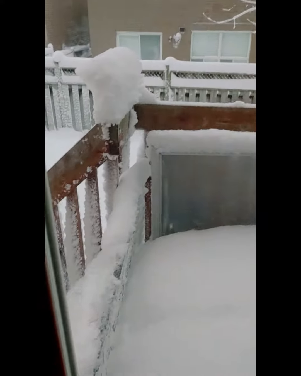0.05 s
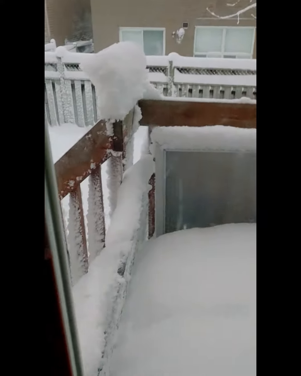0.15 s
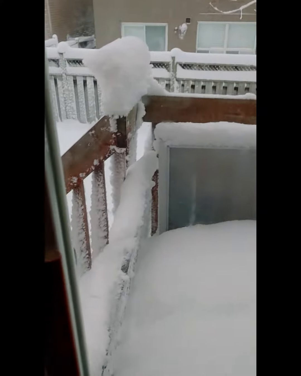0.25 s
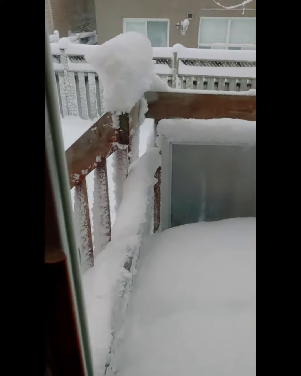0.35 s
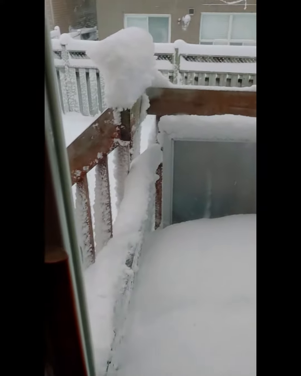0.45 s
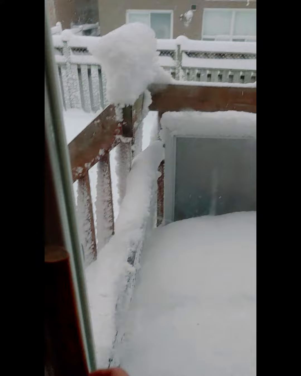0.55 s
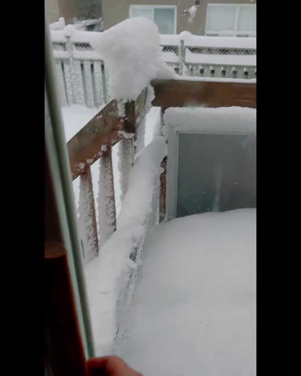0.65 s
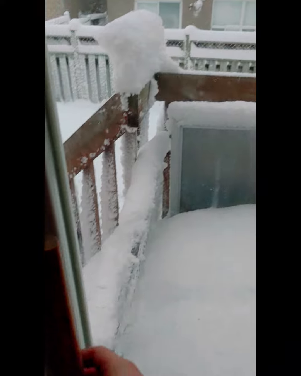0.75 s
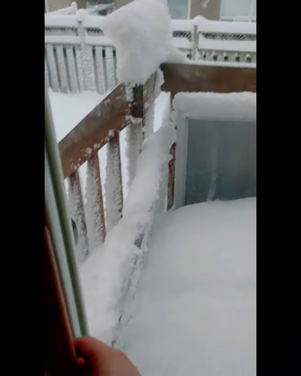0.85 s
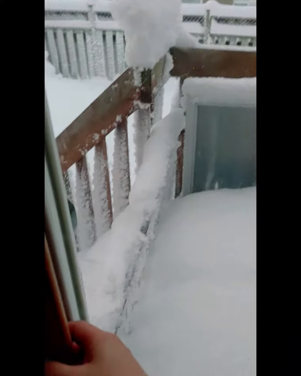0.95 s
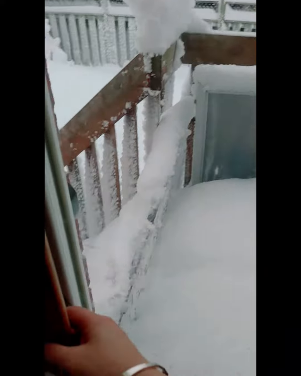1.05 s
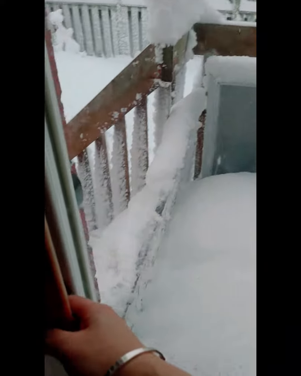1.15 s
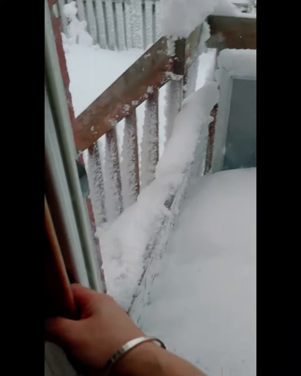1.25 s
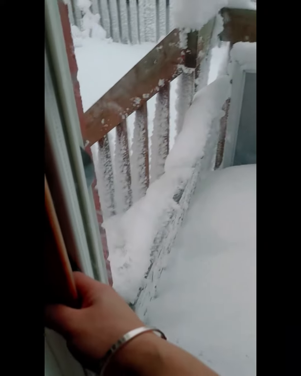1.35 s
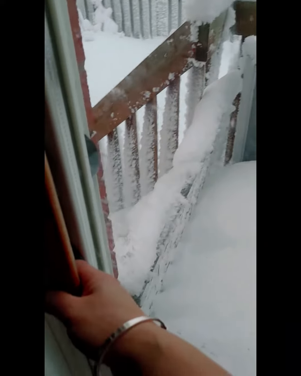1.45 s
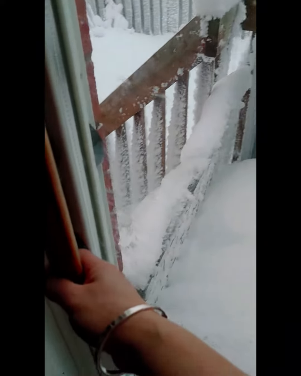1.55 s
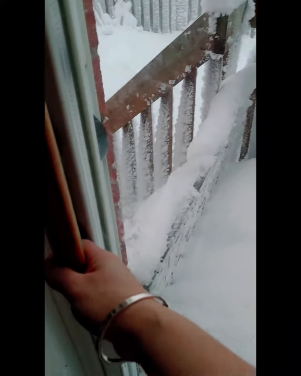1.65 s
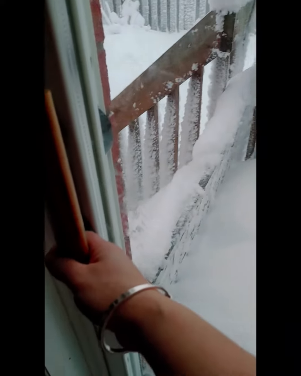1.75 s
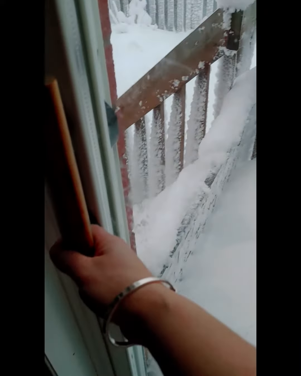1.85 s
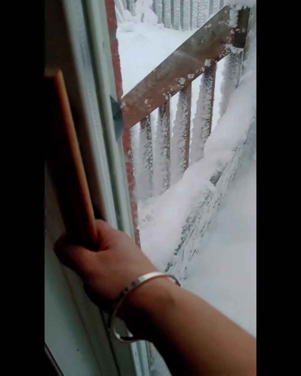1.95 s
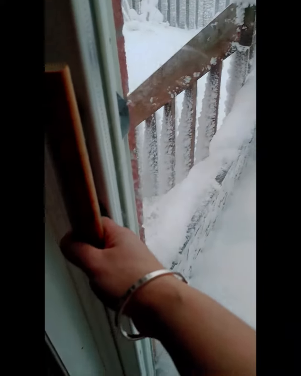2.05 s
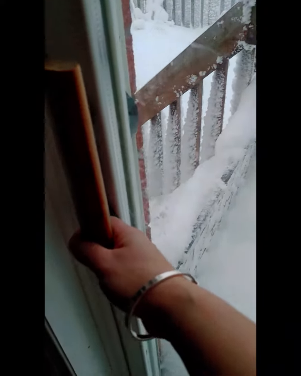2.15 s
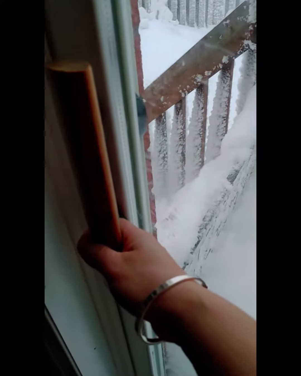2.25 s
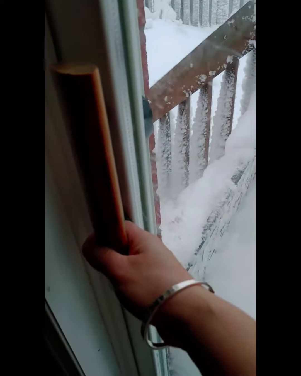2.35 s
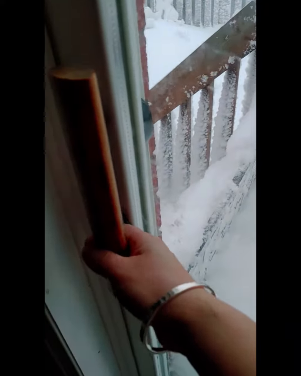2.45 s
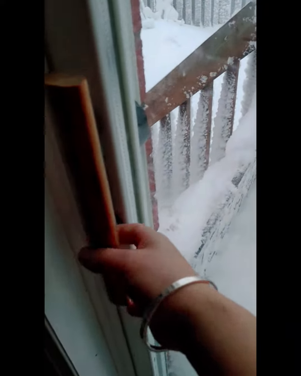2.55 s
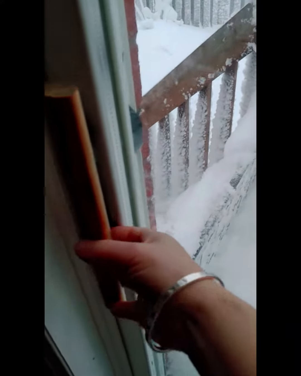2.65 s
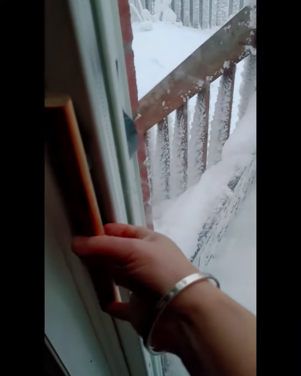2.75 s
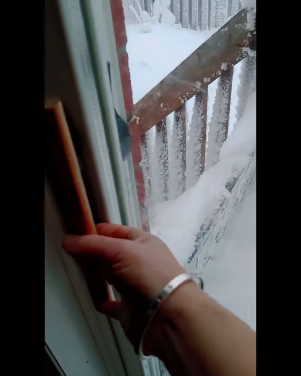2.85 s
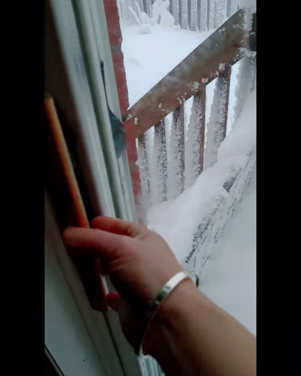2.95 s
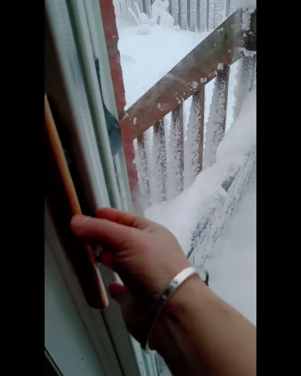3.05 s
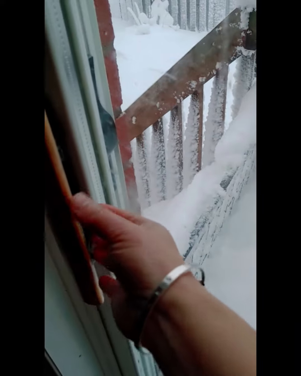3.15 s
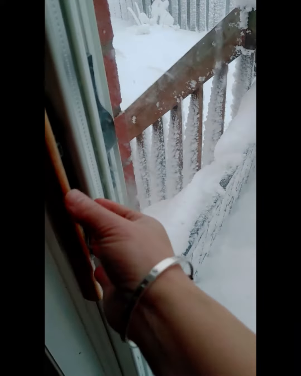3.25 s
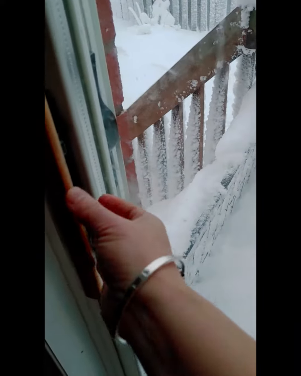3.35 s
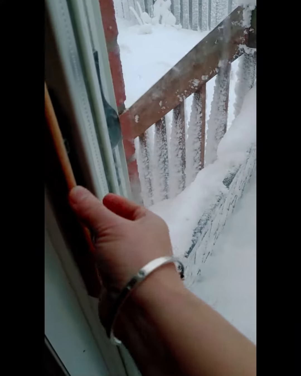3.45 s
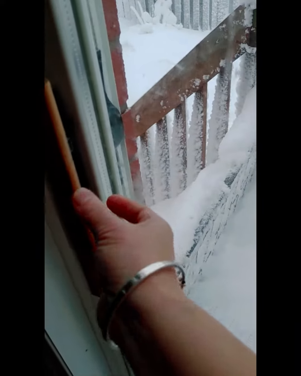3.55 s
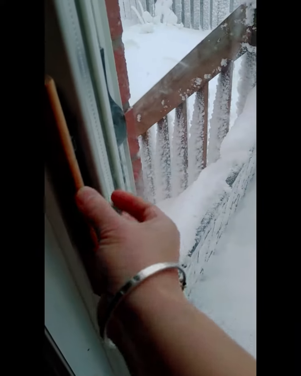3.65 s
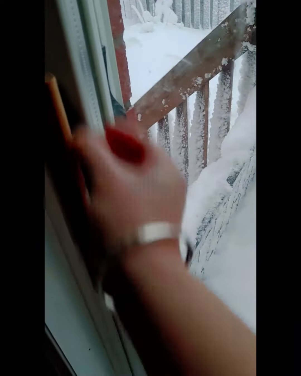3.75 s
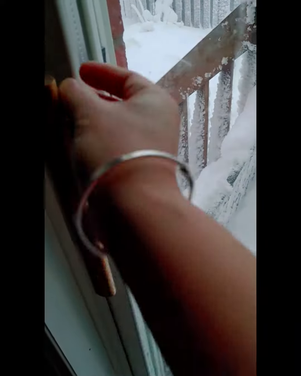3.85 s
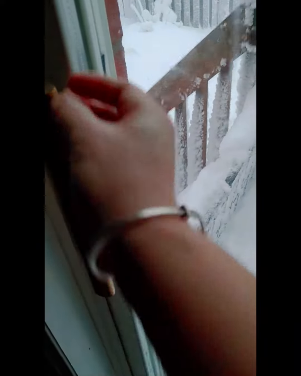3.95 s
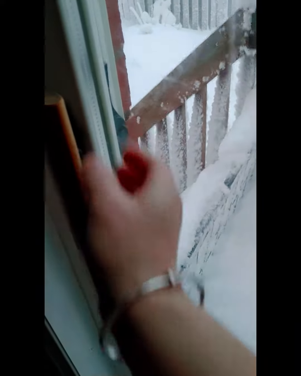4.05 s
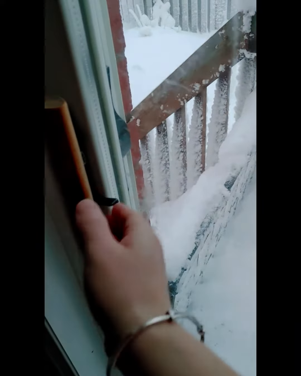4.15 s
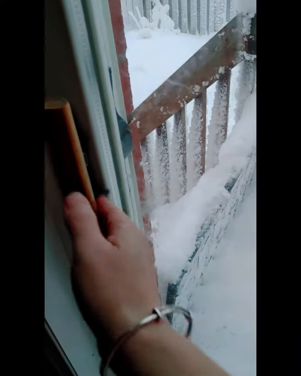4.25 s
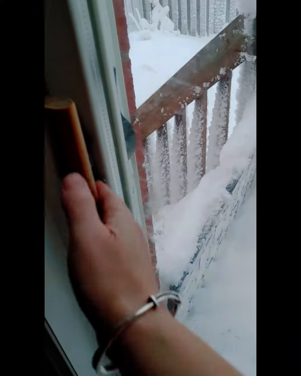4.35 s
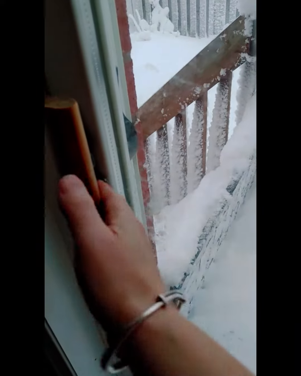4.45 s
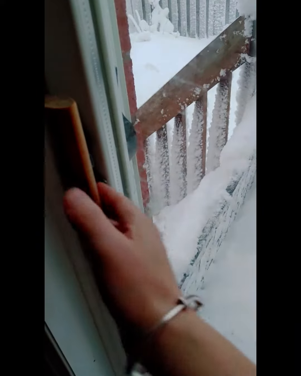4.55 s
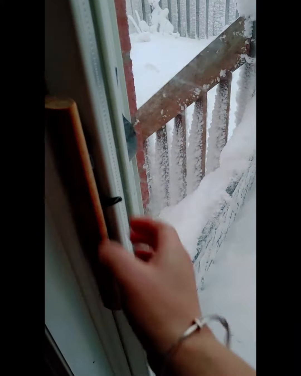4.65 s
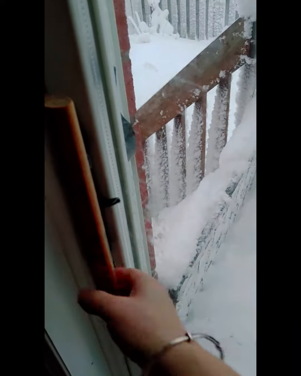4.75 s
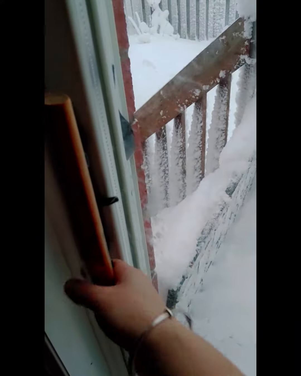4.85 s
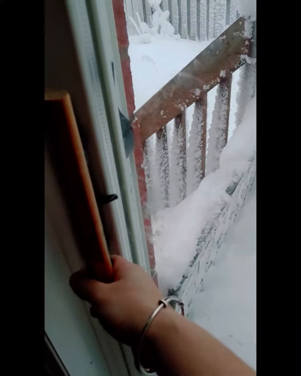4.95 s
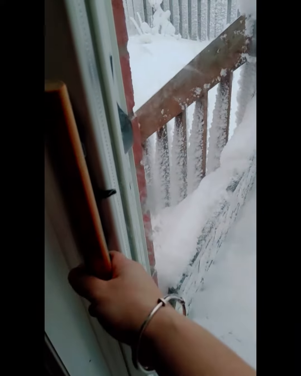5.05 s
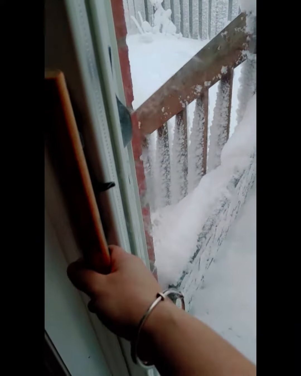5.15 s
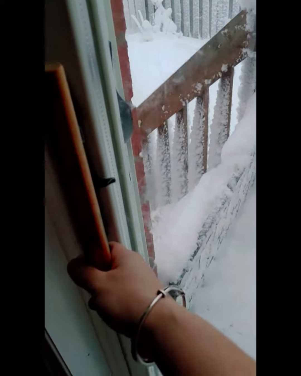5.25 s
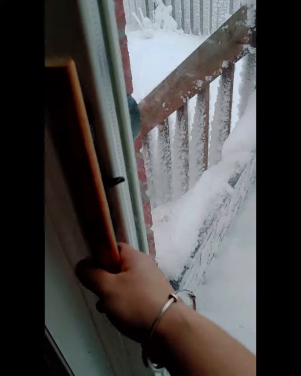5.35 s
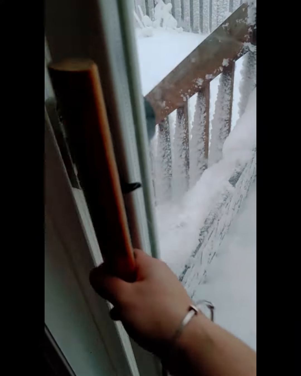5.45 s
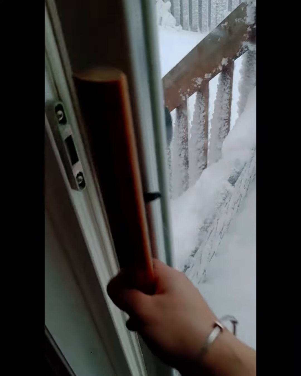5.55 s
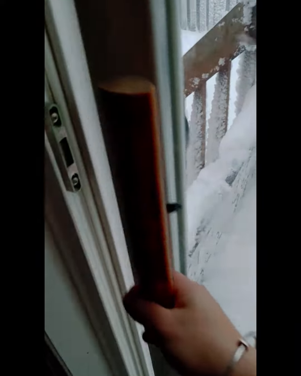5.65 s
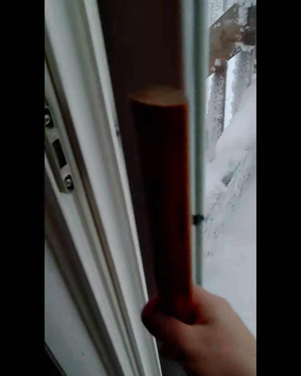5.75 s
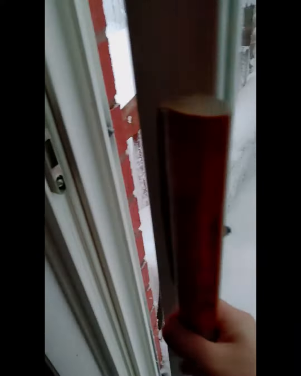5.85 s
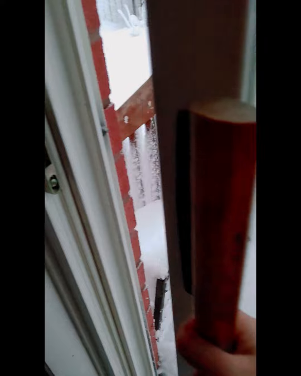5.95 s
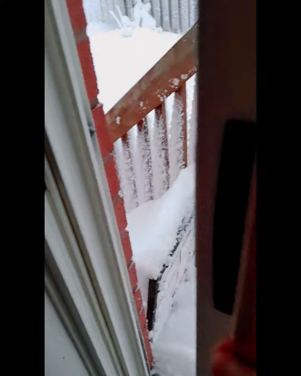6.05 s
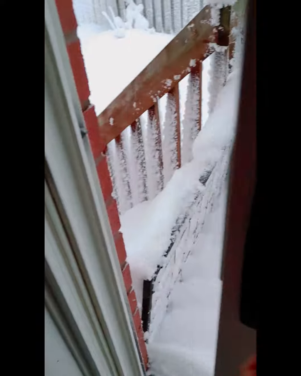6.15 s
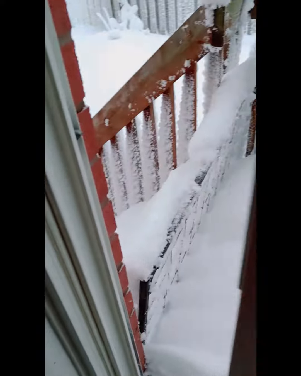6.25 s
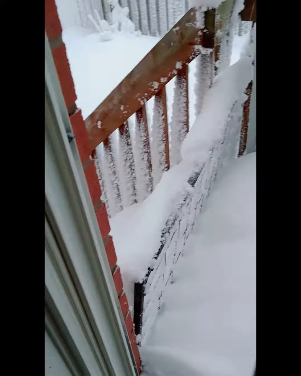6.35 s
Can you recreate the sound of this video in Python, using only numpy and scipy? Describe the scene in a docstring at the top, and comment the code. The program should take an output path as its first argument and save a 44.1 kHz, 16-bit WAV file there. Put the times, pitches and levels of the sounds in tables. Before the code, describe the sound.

Close by in a quiet room with faint ventilation, a hand works a sliding door's wooden handle: sparse clacks, metallic ticks, soft rubs and a tiny squeak. A dense rattle of knocks follows. Then the sticky seal rasps louder and brighter until it snaps free, and the heavy pane rolls away with low rumble, crunching grit and chattering rollers.

```python
"""In a quiet room with a soft ventilation hush, a hand works the wooden handle and latch of a sliding glass door:
clicks, knocks, rubs and squeaks, made as struck resonances and stick-slip friction.
Then the door tears out of its weather seal, a rasp of friction that grows until it comes free.
Last it rolls along the track: the pane rumbles as filtered noise, grit crunches and the rollers rattle.
Two close microphones hear it, the right channel a few milliseconds late."""
import sys
import numpy as np
from scipy import signal
from scipy.fft import rfft, irfft, next_fast_len
from scipy.io import wavfile
from scipy.ndimage import map_coordinates

SR = 44100
rng = np.random.default_rng(int(sys.argv[2]) if len(sys.argv) > 2 else 0)


def bounce(signal):
    """Save signal as a 16-bit WAV file at the path given by the first command-line argument."""
    frames = np.transpose(np.atleast_2d(signal))
    limited = np.clip(frames, -1, 1)
    pcm = np.round(limited * 32767).astype(np.int16)
    wavfile.write(sys.argv[1], SR, pcm)


N = 282681
TIME = np.arange(N) / SR  # s

# All levels are relative. A stroke's half length is the standard deviation of its bell.
# Handle knocking against the door. Each row: start in seconds, latch clack, metal tick, wood and door thud
# in dB, centres of the thud, the clack and the tick in Hz, left minus right in dB.
KNOCKS = [(1.3835, -44, -48, -35.5, -51, 480, 4800, 6700, -1),
          (2.57, -48, -59, -41.5, -79, 517, 2460, 6000, 2.5),
          (2.99, -30.5, -65.5, -34, -47, 700, 3240, 7300, -1.5),
          (3.6825, -51, -61, -48, -61.5, 550, 2490, 7560, 1),
          (3.694, -46, -57, -42.5, -52.5, 290, 2720, 7600, 1),
          (3.712, -54.5, -67.5, -56, -47.5, 320, 2720, 7600, -1.5),
          (3.749, -32, -29, -33, -46, 524, 3500, 7300, 0),
          (3.796, -51.5, -53.5, -62, -47.5, 480, 4300, 7300, 1),
          (3.8266, -50, -50, -54, -41.5, 210, 2520, 7800, 1),
          (4.3785, -44, -42.5, -45.5, -46.5, 600, 2500, 8600, 0.5),
          (4.64, -38.5, -60, -48.5, -45.5, 193, 2840, 8200, 0)]
# Latch clicking on its own. Each row: start in seconds, latch clack in dB, metal tick in dB,
# centre of the clack in Hz, centre of the tick in Hz, left minus right in dB.
CLICKS = [(1.528, -66, -49.5, 2700, 10600, 4), (1.5838, -40.5, -42, 2670, 7500, -1.5),
          (1.891, -79, -62, 4400, 7700, 12), (2.51, -71, -72, 4900, 9000, 3),
          (2.908, -68.5, -72.5, 2430, 7500, -1.5), (3.3, -66.5, -77, 4400, 7000, -3),
          (3.349, -76.5, -70, 3780, 8340, 1.5), (4.319, -60, -69, 3300, 7500, -2),
          (4.6145, -41.5, -57, 2800, 7440, 1.5), (4.636, -65, -57.5, 2700, 8400, 18.5),
          (4.987, -70, -72, 3000, 7500, -1), (5.084, -39.5, -42, 4200, 7970, -0.5)]
# Latch tongue juddering along its keeper. Each row: start in seconds, latch clack in dB, metal tick in dB,
# centre of the clack in Hz.
JUDDERS = [(3.676, -57.5, -60, 4270), (4.5941, -43, -56, 2720)]
# Light touches that only ring the handle and latch. Each row: start in seconds, level in dB, centre in Hz.
TAPS = [(1.53, -76, 2700), (1.552, -69, 2450), (2.136, -61, 1190), (2.632, -64.5, 1170), (2.903, -77, 2430),
        (2.95, -60.5, 1120), (4.285, -70.5, 2550), (4.316, -53, 2480), (4.348, -68, 2430),
        (4.574, -66.5, 2780), (4.642, -56, 1590), (5.082, -55, 1560)]
# Loose handle shuddering. Each row: peak in seconds, level in dB, half length in seconds.
SHUDDERS = [(3.686, -50.5, 0.014), (3.806, -54.5, 0.013)]
# Fingers sliding on the handle. Each row: peak in seconds, level in dB, half length in seconds.
RUBS = [(2.11, -65.5, 0.11), (2.145, -60, 0.0077), (2.63, -65.5, 0.043), (3.728, -48, 0.032),
        (4.32, -63.5, 0.033)]
# Hand brushing the frame. Each row: peak in seconds, level in dB, half length in seconds.
BRUSHES = [(2.12, -90, .07), (2.54, -75, 0.04), (2.7, -82, 0.047), (4.29, -80, 0.031), (4.85, -75.5, 0.049)]
# Squeaks of the gripped handle and the latch. Each row: peak in seconds, level in dB, half length in seconds,
# pitch in Hz, width in Hz, glide in Hz per second.
SQUEAKS = [(2.115, -57.5, 0.033, 1205, 35, 700), (2.13, -67, 0.025, 2500, 120, 1000),
           (3.707, -39, 0.006, 15330, 500, 0), (4.605, -70.5, 0.0065, 14700, 500, 0)]
# Tugs against the seal: the higher rows are patches of the seal giving way, the lower ones surges of the door
# body groaning. Each row: peak in seconds, level in dB, half length in seconds, centre in Hz.
TUGS = [(5.235, -51, 0.014, 280), (5.256, -36.5, 0.016, 1000), (5.3215, -27.5, 0.0055, 1900),
        (5.341, -33, .005, 1300), (5.353, -41.5, 0.013, 400), (5.358, -24.5, 0.0045, 2000)]
# Snaps as the strip unsticks. Each row: start in seconds, level in dB.
UNSTICKINGS = [(5.2499, -47.5), (5.255, -38), (5.27, -31.5), (5.275, -32), (5.2817, -33), (5.286, -29.5),
               (5.2995, -30.5)]
# Bumps in the track jolting the door. Each row: start in seconds, level in dB, centre of the thud in Hz.
BUMPS = [(5.494, -44.5, 416), (5.551, -44, 400), (5.62, -39.5, 400), (5.672, -47, 484), (5.713, -43, 450),
         (5.931, -37.5, 317), (6.252, -40.5, 420)]
# Rollers chattering on the track. Each row: start in seconds, scrape in dB, frame knock in dB,
# length in seconds, centre in Hz.
RATTLES = [(5.666, -42.5, -48, 0.034, 2700), (5.819, -47, -52, 0.028, 4200), (5.856, -49, -56, 0.024, 3400),
           (5.885, -37.5, -43, 0.016, 3000), (5.966, -33.5, -48, 0.022, 3500),
           (6.076, -37.5, -37, 0.05, 2700), (6.177, -43, -44, 0.013, 2600), (6.221, -49, -46, 0.021, 3300),
           (6.263, -46, -48, 0.03, 3200), (6.312, -50, -50, 0.014, 2700), (6.376, -33.5, -47, 0.02, 3200)]
# Pane flexing as it is shoved. Each row: peak in seconds, level in dB, half length in seconds.
FLEXES = [(5.72, -59, 0.28)]

# Resonances of the dry snap at first touch, the wooden handle, the latch, its metal tongue, the snapping strip,
# the hollow frame, the pane, the flexing pane, the track and the air in the ducts.
# Each row: frequency in Hz, width in Hz, level in dB.
TOUCH_MODES = [(1700, 1200, -4.5), (3270, 1050, 7)]
HANDLE_MODES = [(804, 185, -3.5), (1068, 71, 5.5), (1306, 87, 3.5), (1500, 270, -6.5)]
LATCH_MODES = [(2330, 170, 5), (2490, 160, 6.5), (2843, 196, 0.5), (3940, 160, -9), (4330, 560, -3),
               (5510, 240, -19.5)]
METAL_MODES = [(6300, 690, -4), (7500, 1440, 4), (8040, 2180, 0.5), (9450, 900, -7.5), (11640, 1600, -15)]
PEEL_MODES = [(4080, 560, -0.5), (7280, 1000, 6), (11400, 2000, -12.5)]
FRAME_MODES = [(1224, 30, -2), (1272, 25, -2), (1377, 40, 4), (1451, 25, 0), (1531, 30, 3), (1690, 25, -3),
               (2255, 35, -3), (2547, 35, -2), (3872, 40, -3), (4372, 30, -2), (4910, 35, -2),
               (6060, 25, -4), (6997, 40, -1), (7327, 40, -2), (7960, 150, -4)]
PANE_MODES = [(188, 26, -10), (243.3, 19, -6), (257, 6.7, 1), (322, 65, 1), (473, 36, 0.5), (515.8, 30, 5),
              (561.5, 27, 4), (645, 13, -5), (732, 8.2, -5), (832, 13, -11.5)]
FLEX_MODES = [(67, 20, -4), (127, 40, 3.5)]
TRACK_MODES = [(2540, 90, -5), (2790, 80, -7), (3197, 120, -1), (3830, 60, -9), (3950, 60, -8),
               (4940, 52, -5)]
DUCT_MODES = [(166, 9, -9.5), (264.1, 3, -1.5), (312.7, 24, -10), (564, 53, -15)]

# Decaying modes of the handle with its latch case, and low modes of the door.
# Each row: frequency in Hz, level in dB, time to fall 60 dB in seconds.
CASE_MODES = [(797, -6, .07), (1061, -3, .045), (1174, -1, .04), (1340, -4, .06), (1540, -2, .06),
              (2180, -9, .05), (2310, -4, .035), (2440, -2, .032), (2783, 0, .04), (3700, -2, .04),
              (4301, -9, .04), (4500, -5, .032), (4950, -8, .04)]
DOOR_MODES = [(175, -4, 0.081), (197, -4.5, 0.047), (237.2, 3, 0.11), (263, -12.5, 0.1), (317, -5, 0.061),
              (408.4, 5.5, 0.075), (469, -5.5, 0.18), (503, -12, 0.36), (566, -6, 0.16), (643, 5, 0.077),
              (804.4, -3, 0.14)]

# Spectra of skin on wood, the hand on the frame, the seal's rasp, the rolling rumble, grit crushed in the track,
# the scraping rollers and the ventilation hush. Each row: frequency in Hz, density in dB per Hz.
SKIN_SPECTRUM = [(100, -6.5), (220, 5), (600, -3.5), (1200, -3.5), (1900, -16), (2600, -13), (4500, -20),
                 (8000, -21), (10000, -33.5), (15000, -34)]
BRUSH_SPECTRUM = [(1000, -20), (2700, 6), (4300, -12), (5100, 11), (5800, -9), (7500, 3), (10000, -9),
                  (11800, 6.5), (13500, -18)]
RASP_SPECTRUM = [(30, -31), (120, -32), (250, -11.5), (600, -6.5), (900, -4.5), (1400, -8.5), (2000, -5),
                 (2800, -1.5), (4500, -0.5), (5600, -2), (7600, -4.5), (9500, -13.5), (11800, -11.5),
                 (13000, -26), (16000, -32.5)]
RUMBLE_SPECTRUM = [(25, -36.5), (65, -45), (140, -9), (250, -3), (400, 8), (600, 6), (850, 1.5), (1050, -5),
                   (1400, -11), (2000, -9.5), (4000, -49)]
GRIT_SPECTRUM = [(600, -10), (1200, 1), (1900, -4), (2700, 4), (3300, 1), (4500, -3), (5700, -10),
                 (8200, -10), (9800, -26), (11800, -17), (13000, -46), (16000, -47)]
ROLLER_SPECTRUM = [(500, -6), (1100, 6), (1900, -2), (2700, 5.5), (3200, 3.5), (4100, 4.5), (5700, -6),
                   (8200, -8), (9800, -28), (11800, -27), (13000, -46), (16000, -57)]
HUSH_SPECTRUM = [(15, -78), (25, -46.5), (75, -21), (135, -14.5), (163, -13), (202, -15.5), (264, -11.5),
                 (354, -18), (488, -15), (655, -25.5), (927, -24), (1150, -29.5), (2130, -38),
                 (2630, -35.5), (15000, -54)]

# Likeness of the two microphones. Each row: frequency in Hz, correlation from 0 to 1.
ALIKE = [(60, 0.73), (250, 0.96), (500, 0.53), (800, 0.06), (2000, 0.061), (10000, 0.1)]
# Decay of the room. Each row: frequency in Hz, time to fall 60 dB in seconds.
ROOM_DECAY = [(200, 0.47), (1400, 0.3), (4000, 0.3), (8000, 0.32), (14000, 0.14)]

CONTACT_RISE_S = .0007  # a contact builds up over this time
TOUCH_DB, PING_DB = -7, -10.5  # first snap and ringing case, beside the clack
WOOD_SHARE_DB = -14  # the wood's answer to a click of the latch
CATCH_S = .0044  # between the catches of a judder
BOUNCE_ABOVE_DB = -35  # a louder clack makes the latch bounce
BOUNCE_S, BOUNCE_LOSS_DB, BOUNCE_DULL_DB = 0.0245, 10.5, 14.5  # flight, loss, metal and wood under the clack
# The seal: first drag, time to grip, release, fall by 60 dB
SEAL_START_S, SEAL_GRIP_S, SEAL_FREE_S, SEAL_FADE_S = 5.0584, 0.1, 5.363, 0.022
# Level once it grips, how far below that it starts, growth under the pull
SEAL_DB, SEAL_SLACK_DB, SEAL_RISE_DB_PER_S = -34.5, 38, 39.5
SEAL_HISS_DB_PER_S = 52.5  # added growth of the topmost hiss, beside the rasp
GROAN_DB, GROAN_DB_PER_S = -8, 46  # the frame's groan beside the rasp at release, and its growth
TUG_SPREAD = 1.65  # band edges lie this ratio below and above a tug's centre
ROLL_START_S, SPEED_UP_S = 5.367, 0.3  # the door gathers speed
RUMBLE_DB, GRIT_DB, GRIT_POWER = -35, -55.5, 1.64  # mix gains at full speed; grit grows as a power of speed
RATTLE_RISE_S, RATTLE_FOCUS_DB = 0.0078, 5  # build-up; loss an octave away from the centre
WHEELS_ROOM_DB = -15  # room gain of the rollers
TOP_HZ, LOW_CUT_HZ = 16000, 35  # band limit; the microphones' bass roll-off
RIGHT_LAG_S = .00385


def knocks():
    """Impact excitation: the handle knocks, rocking the door; a hard knock makes the latch bounce."""
    out = np.zeros((2, N))
    for s, latch_db, metal_db, wood_db, thud_db, push_hz, clack_hz, tick_hz, pan_db in KNOCKS:
        add(out, s, contact(latch_db, metal_db, wood_db, clack_hz, tick_hz), pan_db)
        add(out, s, amp(thud_db) * thud(push_hz))
        if latch_db > BOUNCE_ABOVE_DB:
            db = latch_db - BOUNCE_LOSS_DB
            dull_db = db - BOUNCE_DULL_DB
            add(out, s + BOUNCE_S, contact(db, dull_db, dull_db, clack_hz, tick_hz), pan_db)
    return out


def latch(count=3):
    """Impact excitation: single clicks, judders of a few quick catches, and light ringing taps."""
    out = np.zeros((2, N))
    for s, latch_db, metal_db, clack_hz, tick_hz, pan_db in CLICKS:
        add(out, s, contact(latch_db, metal_db, latch_db + WOOD_SHARE_DB, clack_hz, tick_hz), pan_db)
    for s, latch_db, metal_db, clack_hz in JUDDERS:
        for k in range(count):
            catch = contact(latch_db, metal_db, latch_db + WOOD_SHARE_DB, clack_hz, tick_hz=7860)
            add(out, s + k * CATCH_S, catch)
    for s, db, centre_hz in TAPS:
        add(out, s, amp(db) * modal(CASE_MODES, centre_hz, slope_db=34, rise=.002))
    return out


def contact(latch_db, metal_db, wood_db, clack_hz, tick_hz):
    """Coupled resonators: one contact snaps, then shakes the wooden handle, latch, metal tongue and case."""
    snap = strike(TOUCH_MODES, 1300, 7000, crack=0.002, ring=0.01, ring_db=-25)
    wood = strike(HANDLE_MODES, 360, 1400, crack=0.0026, ring=0.084, ring_db=-26)
    clack_modes = favour(LATCH_MODES, clack_hz, slope_db=7.0)
    clack = strike(clack_modes, 2580, 5900, crack=0.0018, ring=0.047, ring_db=-21.0)
    tick_modes = favour(METAL_MODES, tick_hz, slope_db=18.5)
    tick = strike(tick_modes, 5100, 14000, crack=0.0023, ring=0.03, ring_db=-19.5)
    ping = modal(CASE_MODES, clack_hz, slope_db=16.5, rise=.0008)[:, :SR // 5]
    return (amp(latch_db + TOUCH_DB) * snap
            + amp(wood_db - 4.5) * wood
            + amp(latch_db - 4.0) * clack
            + amp(metal_db - 6.5) * tick
            + amp(latch_db + PING_DB) * ping)


def thud(push_hz):
    """Modal excitation: a soft push wakes the door's lowest modes, a harder one the higher modes."""
    return modal(DOOR_MODES, push_hz, slope_db=9.5, rise=0.005)


def clatter():
    """Repeated impact: the loose handle shudders in its mount, a dense run of tiny contacts."""
    catches = friction([(300, 0), (9000, 0)], grain_db=3.5, rate=170, slip_db=30)
    wood = unit(filtered(catches, lambda f: body(HANDLE_MODES, f)))
    case = unit(filtered(catches, lambda f: body(LATCH_MODES, f)))
    return swells(SHUDDERS) * band(wood + amp(-2.5) * case, 300, 6000)


def hand():
    """Stick-slip friction: skin rubs on the wood in tiny catches, and brushes softly over the frame."""
    rubs = swells(RUBS) * friction(SKIN_SPECTRUM, grain_db=-2.5, rate=130, slip_db=6.0)
    brushes = swells(BRUSHES) * friction(BRUSH_SPECTRUM, grain_db=3.0, rate=250, slip_db=-1)
    return rubs + brushes


def squeaks():
    """Stick-slip oscillation: brief whistles, each a narrow band that may glide upward."""
    out = np.zeros((2, N))
    for s, db, half, hz, width, glide in SQUEAKS:
        phase = 2 * np.pi * np.cumsum(hz + glide * (TIME - s)) / SR
        whistle = unit(wobble(width) * np.sin(phase) + wobble(width) * np.cos(phase))
        out += swells([(s, db, half)]) * whistle
    return out


def seal():
    """Friction under growing load: the strip grips, rasps louder and brighter and comes free; the frame groans."""
    gripped = TIME - SEAL_START_S - SEAL_GRIP_S
    outside = np.maximum(SEAL_START_S - TIME, 0) + np.maximum(TIME - SEAL_FREE_S, 0)
    to_go = np.maximum(SEAL_FREE_S - TIME, 0)
    slack_db = SEAL_SLACK_DB * np.clip(gripped / SEAL_GRIP_S, -1, 0)
    pull_db = SEAL_DB + slack_db + SEAL_RISE_DB_PER_S * np.maximum(gripped, 0)
    drag = friction(RASP_SPECTRUM, grain_db=2.6, rate=190, slip_db=16)
    hiss = filtered(drag, lambda f: 1 - 1 / (1 + (f / 9000) ** 12))
    drag = drag - hiss + hiss * amp(7.0 - SEAL_HISS_DB_PER_S * to_go)
    groan = unit(band(friction(RASP_SPECTRUM, grain_db=3, rate=130, slip_db=20), 1100, 1750))
    groan = amp(GROAN_DB - GROAN_DB_PER_S * to_go) * groan
    rasp = amp(pull_db - 60 * outside / SEAL_FADE_S) * (drag + groan)
    ringing = frame(rasp + tugs(), ring=0.021, ring_db=-7.5)
    # Single-mode calls keep every frame resonance in the same polarity
    return filtered(ringing, lambda f: 0.79 + sum(body([mode], f) for mode in FRAME_MODES)) + peel()


def tugs():
    """Stick-slip release: patches of the seal give way and the door body groans in surges, each a short, rough
    band at its own pitch."""
    slips = friction(RASP_SPECTRUM, grain_db=2.5, rate=330, slip_db=18)
    out = np.zeros((2, N))
    for s, db, half, hz in TUGS:
        out += swells([(s, db, half)]) * unit(band(slips, hz / TUG_SPREAD, hz * TUG_SPREAD))
    return out


def peel():
    """Sudden release of adhesion: the strip unsticks in a short, uneven run of bright snaps."""
    out = np.zeros((2, N))
    for s, db in UNSTICKINGS:
        snap = strike(PEEL_MODES, 1570, 15000, crack=0.0026, ring=0.011, ring_db=-33)
        add(out, s, amp(db) * snap, pan_db=3.0)
    return out


def rolling():
    """Rolling excitation: rollers gather speed, shake the pane, crunch grit and chatter; gives rumble and wheels."""
    speed = 1 - np.exp(-np.maximum(TIME - ROLL_START_S, 0) / SPEED_UP_S)  # 1 at full speed
    pane = amp(-2.0) * noise(lambda f: body(PANE_MODES, f))
    pane = pane + amp(-3.5) * speed * noise(lambda f: amp(along(RUMBLE_SPECTRUM, f)))
    pane = filtered(pane, lambda f: 1 / (1 + (f / 1500) ** 4))  # the heavy glass passes little treble
    lumps = amp(1.9 * wobble(28))
    flex = swells(FLEXES) * noise(lambda f: body(FLEX_MODES, f) / (1 + (f / 200) ** 2))
    rumble = amp(RUMBLE_DB) * speed * lumps * pane + flex + bumps()
    crunch = amp(GRIT_DB) * speed ** GRIT_POWER * grit()
    wheels = frame(crunch + rattles(), ring=0.028, ring_db=-1.0)
    # Each ring of the track comes and goes on its own
    rings = sum(filtered(wheels, lambda f: body([mode], f)) * amp(4 * wobble(14)) for mode in TRACK_MODES)
    return rumble * amp([[-1], [1]]), 0.69 * wheels + 1.02 * rings  # rumble 2 dB stronger on the right


def bumps():
    """Modal excitation: each bump in the track rings the door's low modes."""
    out = np.zeros((2, N))
    for s, db, push_hz in BUMPS:
        add(out, s, amp(db) * thud(push_hz))
    return out


def rattles():
    """Intermittent contact: short runs of scrapes, each with its own pitch, over a hollow knocking of the frame."""
    out, t = np.zeros((2, N)), np.arange(SR // 5) / SR
    scrapes = friction(ROLLER_SPECTRUM, grain_db=3.5, rate=170, slip_db=27)
    knocking = unit(band(friction(RUMBLE_SPECTRUM, grain_db=3, rate=110, slip_db=20), 600, 1400))
    for k, (s, db, jolt_db, length, centre_hz) in enumerate(RATTLES):
        shape = (1 - np.exp(-t / RATTLE_RISE_S)) * np.exp(-(t / length) ** 2)
        part = slice(k * len(t), (k + 1) * len(t))  # a fresh stretch of friction for each rattle
        focus = lambda f: amp(-RATTLE_FOCUS_DB * np.abs(np.log2((f + 1) / centre_hz)))
        scrape = unit(filtered(shape * scrapes[:, part], focus)) * np.sqrt(np.mean(shape ** 2))
        add(out, s, amp(db) * scrape + amp(jolt_db) * shape * knocking[:, part])
    return out


def grit():
    """Granular crushing: uneven patches of crunch, the lower and upper ranges coming and going on their own."""
    crunch = friction(GRIT_SPECTRUM, grain_db=3.2, rate=105, slip_db=18)
    low = filtered(crunch, lambda f: 1 / (1 + (f / 3000) ** 8))
    high = crunch - low
    return unit(low * amp(2 * wobble(45)) + 0.65 * high * amp(2 * wobble(45)))


def frame(x, ring, ring_db):
    """Convolution with a decaying tail: the hollow frame adds a short, dense metallic ring."""
    t = np.arange(SR // 4) / SR
    tail = rng.standard_normal((2, len(t))) * amp(-60 * t / ring)
    return x + amp(ring_db) * signal.fftconvolve(x, tail / np.linalg.norm(tail[0]), axes=1)[:, :N]


def house():
    """Broadband flow noise: soft ventilation, a hush with a few low duct resonances."""
    air = amp(-67.0) * noise(lambda f: amp(along(HUSH_SPECTRUM, f)))
    ducts = amp(-68.5) * noise(lambda f: body(DUCT_MODES, f) / (1 + (f / 700) ** 2))
    return air + ducts * amp(1.5 * wobble(9.8))


def room(x):
    """Reverberation: a small room answers each microphone with its own tail, decaying by frequency."""
    hz, t, z = signal.stft(rng.standard_normal((2, SR // 2)), SR, nperseg=256)
    decay = amp(-60 * t / along(ROOM_DECAY, hz)[:, None]) * (1 - np.exp(-t / 0.0009))
    tail = signal.istft(z * decay, SR, nperseg=256)[1]
    return signal.fftconvolve(x, tail / np.linalg.norm(tail[0]), axes=1)[:, :N]


def strike(modes, lo_hz, hi_hz, crack, ring, ring_db):
    """Source and filter: a crack and a dense dying ring, coloured by resonances; energy of 20 ms at rms 1."""
    t = np.arange(SR // 5) / SR
    decay = amp(-60 * t / crack) + amp(ring_db - 60 * t / ring)  # crack and ring fall 60 dB in their seconds
    push = decay * pair(rng.standard_normal((2, len(t))))
    push *= 1 - np.exp(-t / CONTACT_RISE_S)
    x = band(filtered(push, lambda f: body(modes, f)), lo_hz, hi_hz)
    return x / np.linalg.norm(x, axis=1, keepdims=True) * np.sqrt(SR / 50)


def modal(modes, centre_hz, slope_db, rise):
    """Modal superposition: a push wakes the modes nearest its centre frequency; rms 1 over the first 25 ms."""
    t = np.arange(SR // 2) / SR
    hz, level_db, t60 = np.transpose(modes)[..., None]
    uneven_db = rng.normal(0, 2.4, (2, len(modes), 1))  # drawn apart for each channel
    weight = amp(level_db + uneven_db - slope_db * np.abs(np.log2(hz / centre_hz)))
    partials = amp(-60 * t / t60) * np.sin(2 * np.pi * hz * t + rng.uniform(0, 2 * np.pi, hz.shape))
    ring = weight[..., 0] @ partials
    ring *= 1 - np.exp(-t / rise)
    return ring / np.std(ring[:, :SR // 40])


def favour(modes, centre_hz, slope_db):
    """Point of excitation: where a part is struck decides which modes speak; others lose slope_db an octave."""
    return [(hz, width, db - slope_db * abs(np.log2(hz / centre_hz))) for hz, width, db in modes]


def friction(spectrum, grain_db, rate, slip_db):
    """Stick-slip: about rate catches a second, of uneven size, each changing by -slip_db before the next."""
    cycle = np.cumsum(rate * amp(2.5 * wobble(rate / 2))) / SR
    catch_db = grain_db * wobble(rate) - slip_db * (cycle % 1)
    catches = amp(catch_db) * rng.standard_normal((2, N))
    return unit(filtered(pair(catches), lambda f: amp(along(spectrum, f))))


def noise(response):
    """Spectral shaping: coloured stereo noise of rms 1."""
    return unit(filtered(pair(rng.standard_normal((2, N))), response))


def pair(x):
    """Spatial coherence: two unrelated signals become two microphones, correlated by frequency."""
    turn = lambda f: np.arccos(np.clip(along(ALIKE, f), -1, 1)) / 2
    mid, side = filtered(x, lambda f: np.array([np.cos(turn(f)), np.sin(turn(f))]))
    return np.array([mid + side, mid - side])


def body(modes, f):
    """Resonance: causal response of a set of damped modes, alternating in sign."""
    total = 0
    for k, (c, w, db) in enumerate(modes):
        total = total + (-1) ** k * amp(db) * 1j * f * w / (c * c - f * f + 1j * f * w)
    return total


def band(x, lo_hz, hi_hz):
    """Band limitation: a causal band-pass."""
    sos = signal.butter(3, [lo_hz, min(hi_hz, SR / 2 - 1)], "band", fs=SR, output="sos")
    return signal.sosfilt(sos, x)


def filtered(x, response):
    """Linear filtering: the spectrum of x times a complex response of frequency."""
    n = x.shape[-1]
    m = next_fast_len(n + 8192)  # padded so that tails do not wrap round
    return irfft(rfft(x, m) * response(np.fft.rfftfreq(m, 1 / SR)), m)[..., :n]


def swells(rows):
    """Amplitude envelope: the gain of a set of bell-shaped strokes."""
    return sum(amp(db) * np.exp(-((TIME - s) / half) ** 2 / 2) for s, db, half in rows)


def wobble(rate):
    """Random modulation: a smooth random curve, rate knots a second."""
    return map_coordinates(rng.standard_normal(int(N * rate / SR) + 4), [TIME * rate])


def along(points, hz):
    """Interpolation: (Hz, value) points read on a log frequency axis."""
    f, v = np.transpose(points)
    return np.interp(np.log(hz + 1), np.log(f + 1), v)


def amp(db):
    """Level: decibels to gain."""
    return 10 ** (np.asarray(db) / 20)


def unit(x):
    """Normalisation: x scaled to rms 1."""
    return x / np.sqrt(np.mean(x ** 2) + 1e-20)


def add(out, s, sound, pan_db=0):
    """Superposition: mix a stereo sound in at time s, the left pan_db above the right."""
    part = out[:, round(s * SR):][:, :sound.shape[1]]
    part += sound[:, :part.shape[1]] * amp(np.array([[pan_db], [-pan_db]]) / 2)


def scene():
    """Direct and reverberant sound: the handle is near and dry; the long seal and rollers fill more of the room."""
    near = knocks() + latch() + clatter() + hand() + squeaks()
    rasp = seal()
    rumble, wheels = rolling()
    reverb = room(amp(-19.0) * near + amp(-8.5) * rasp + amp(WHEELS_ROOM_DB) * wheels)
    return near + rasp + rumble + wheels + reverb + house()


def record(dry):
    """Delay and band limit: the right channel runs late, the deepest bass is thinned, the top is cut off."""
    lags = np.array([[0], [RIGHT_LAG_S]])
    bass_cut = lambda f: f / np.hypot(f, LOW_CUT_HZ)
    return filtered(dry, lambda f: (f < TOP_HZ) * bass_cut(f) * np.exp(-2j * np.pi * f * lags))


dry = scene()
out = record(dry)
bounce(out)
```